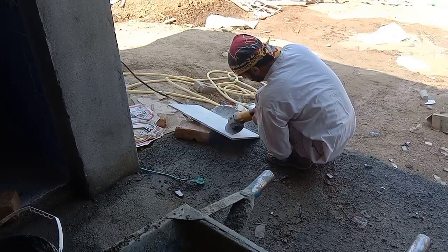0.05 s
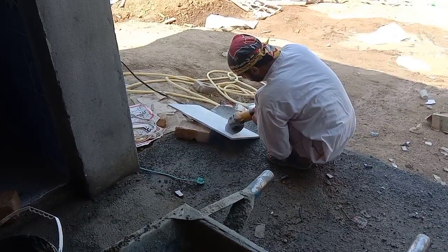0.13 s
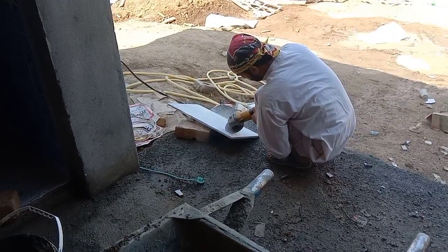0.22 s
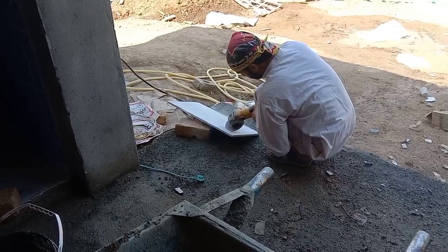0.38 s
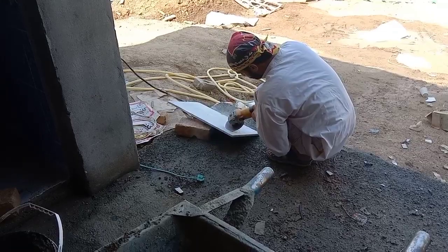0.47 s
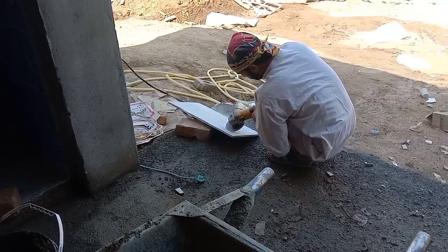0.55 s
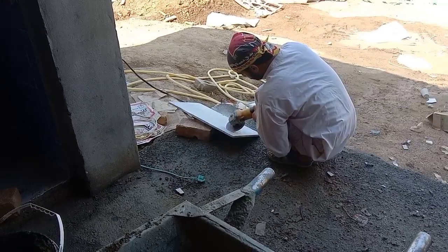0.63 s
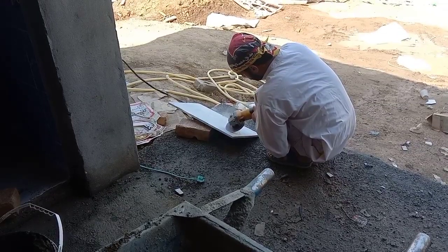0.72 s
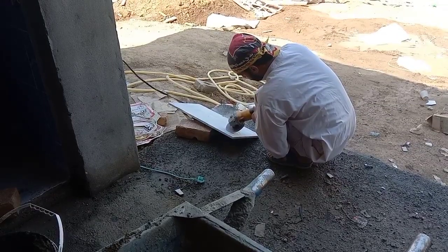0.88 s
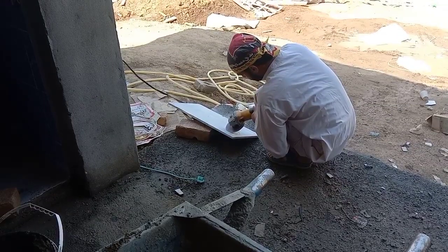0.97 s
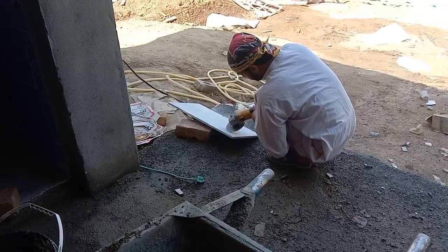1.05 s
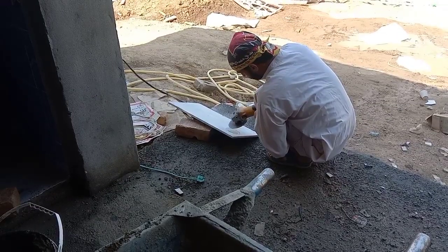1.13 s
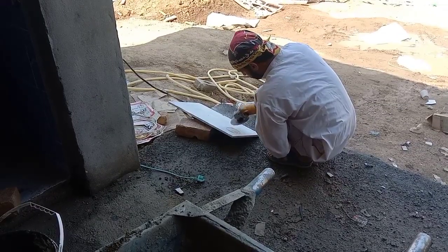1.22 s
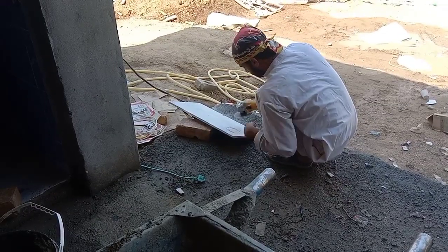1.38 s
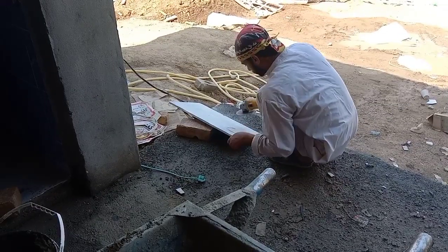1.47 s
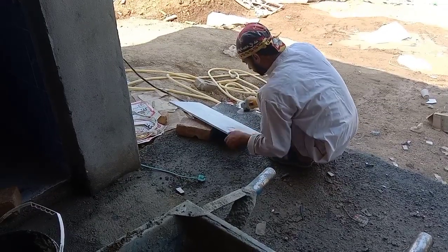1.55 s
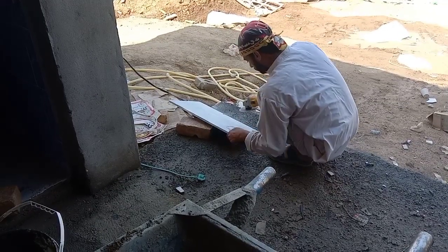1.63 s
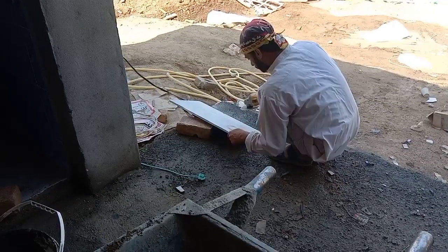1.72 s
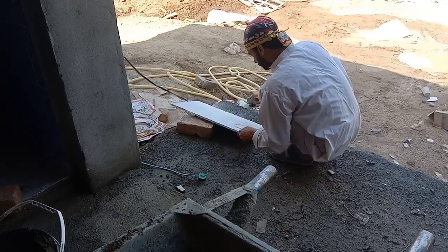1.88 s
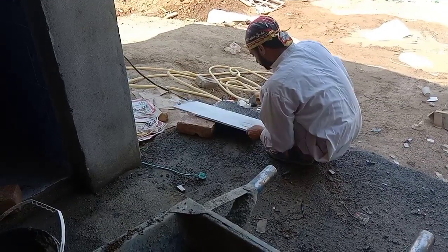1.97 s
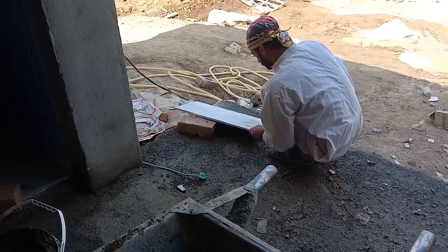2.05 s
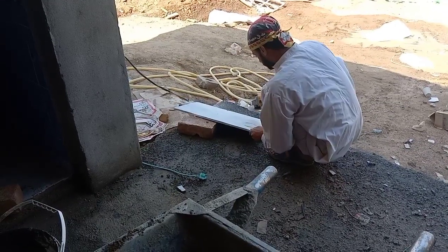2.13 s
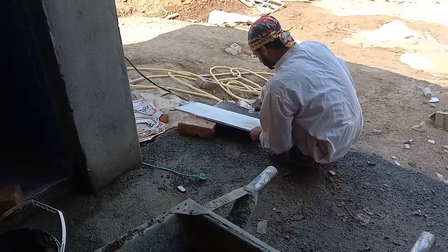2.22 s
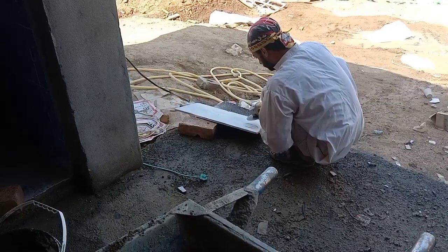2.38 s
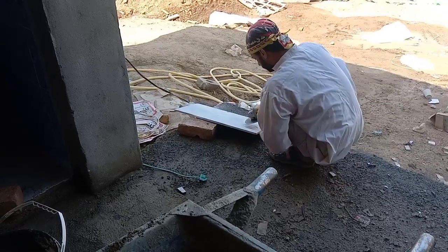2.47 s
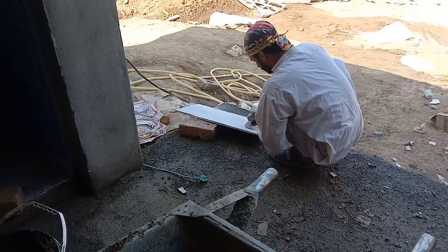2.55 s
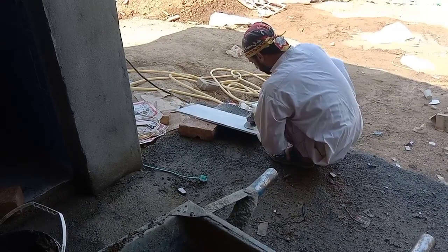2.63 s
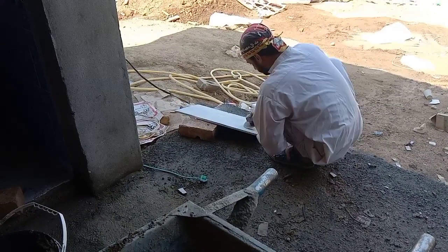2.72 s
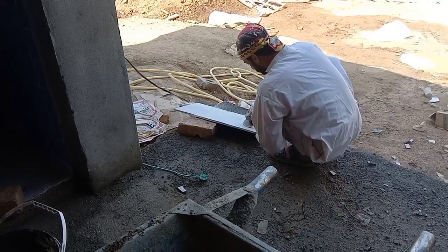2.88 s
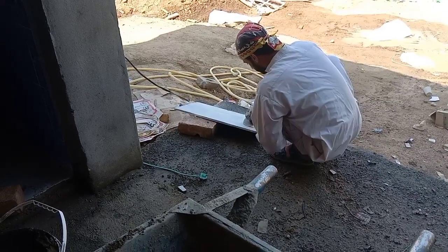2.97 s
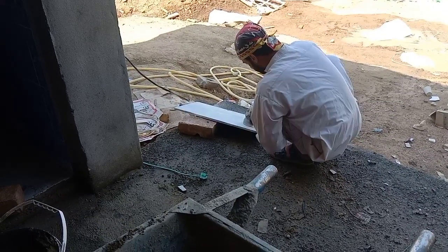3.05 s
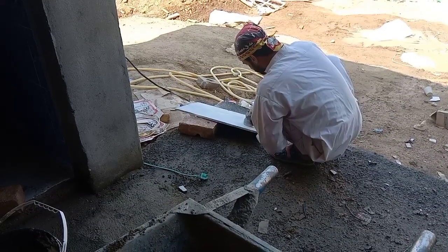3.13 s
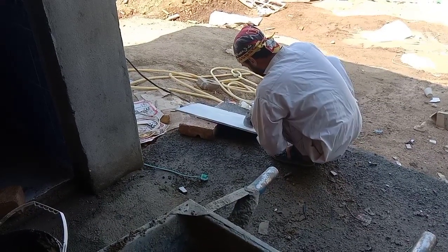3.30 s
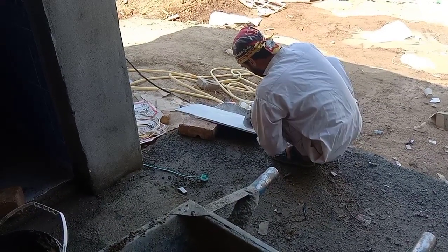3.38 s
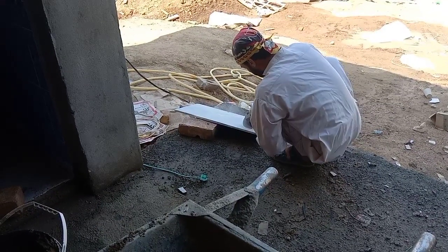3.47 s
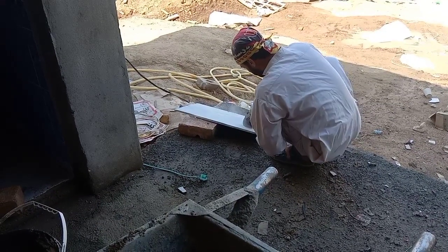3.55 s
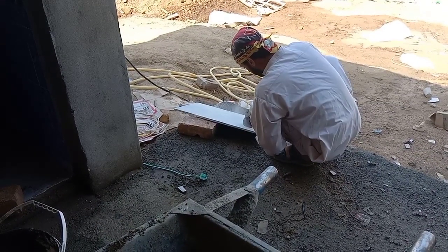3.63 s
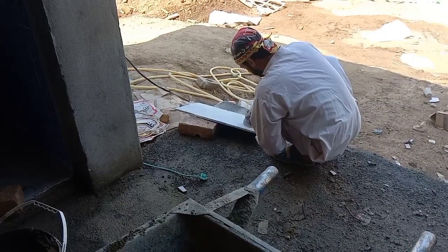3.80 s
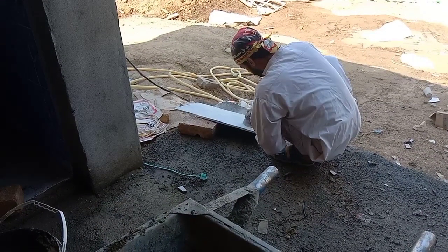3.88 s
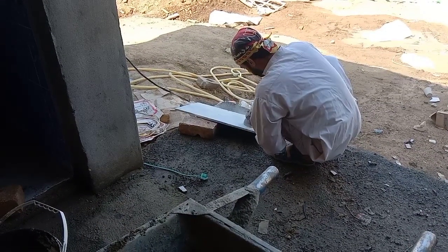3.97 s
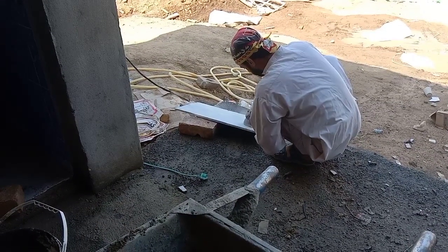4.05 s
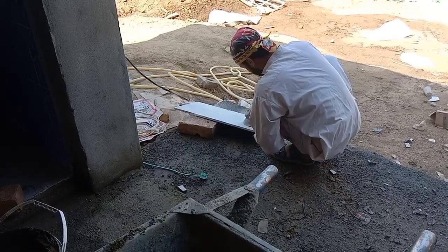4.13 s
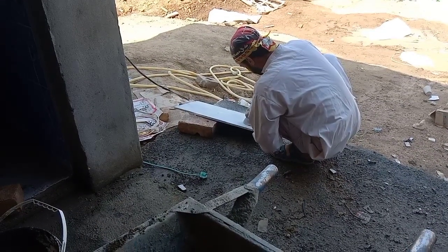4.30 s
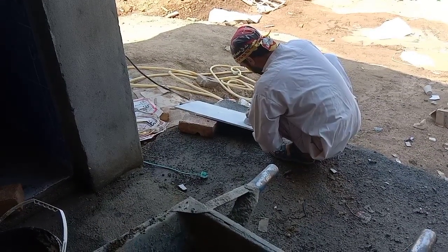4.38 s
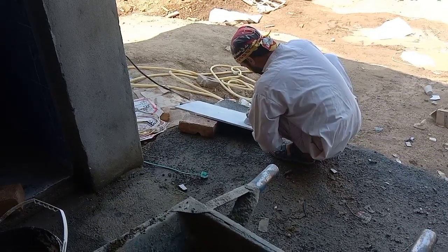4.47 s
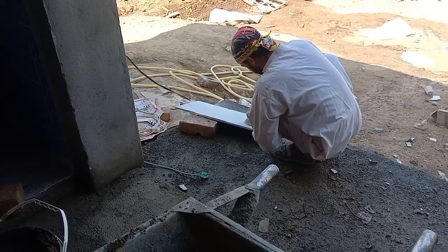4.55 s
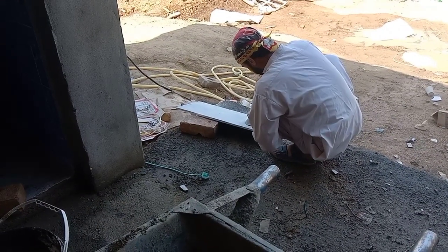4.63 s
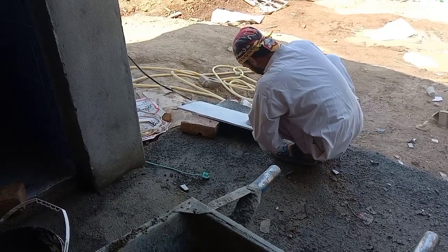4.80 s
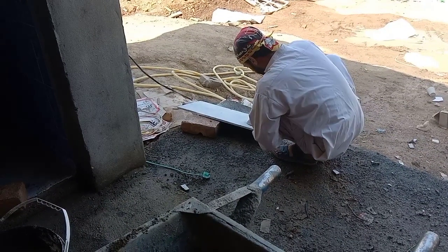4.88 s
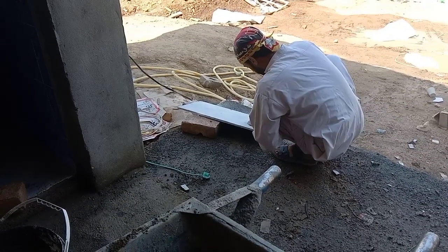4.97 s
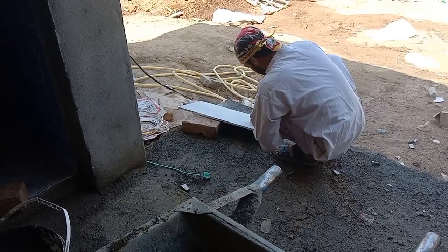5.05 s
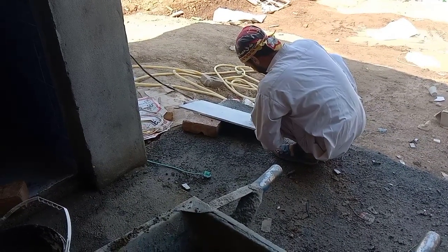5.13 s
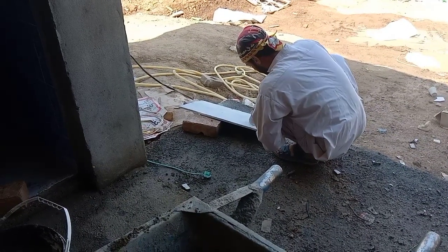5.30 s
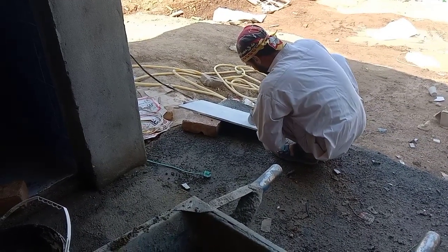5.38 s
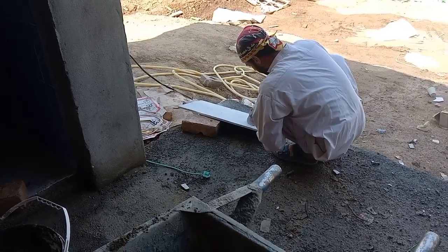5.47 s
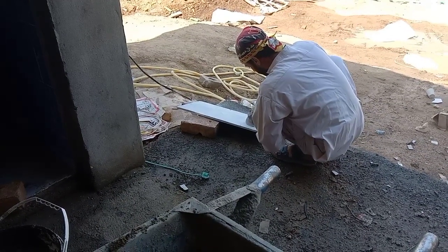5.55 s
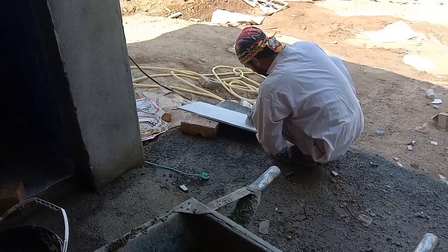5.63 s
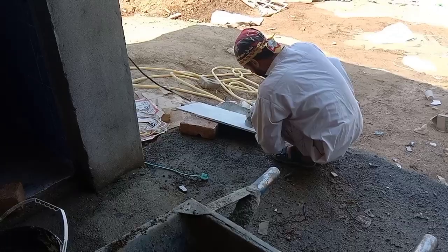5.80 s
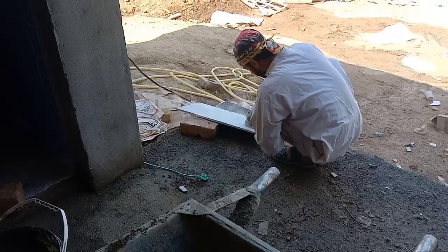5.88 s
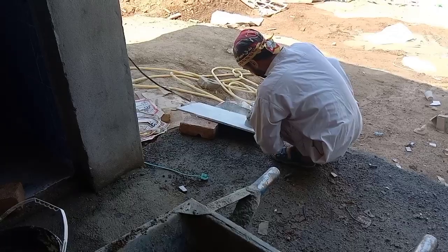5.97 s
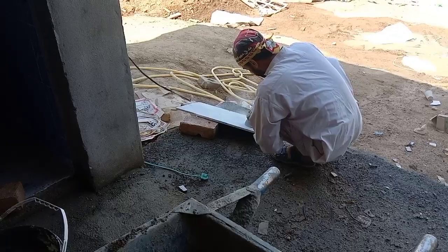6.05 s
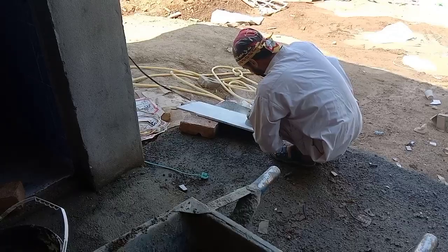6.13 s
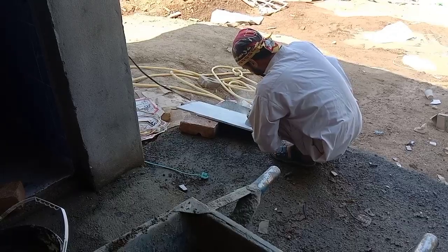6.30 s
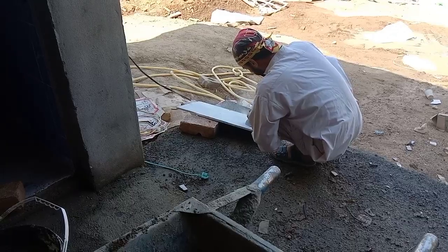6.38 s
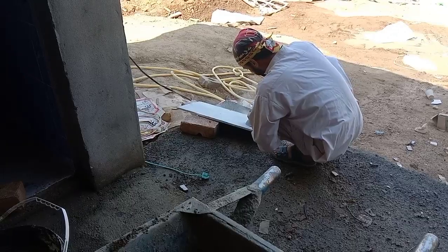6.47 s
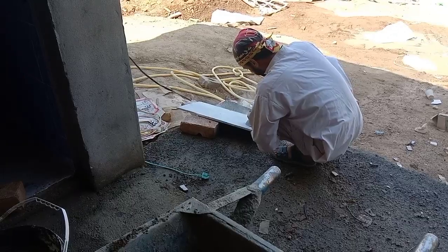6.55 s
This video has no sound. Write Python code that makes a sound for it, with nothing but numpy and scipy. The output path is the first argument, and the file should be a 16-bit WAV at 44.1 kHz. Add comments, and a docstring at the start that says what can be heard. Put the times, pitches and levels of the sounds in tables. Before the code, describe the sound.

A few steps away outdoors, a steel blade squeals and hisses through stone as an angle grinder works on a slab. The cut stops and the motor runs free with a rushing hum, joined by one short scrape of the slab. The blade ticks against the stone twice, then sinks into a long, ringing screech. A short pause of humming and two more taps precede a final loud cut.

```python
"""An angle grinder is cutting a marble slab propped on a brick, outdoors on a building site: diamond
grit tears at the stone, the steel blade screeches and the slab rings. At 1.1 s the blade lifts and the
motor runs up, humming in the rush of its fan and gears. At 2 s the slab is pushed along the brick.
From 2.6 s two touches lead into a long cut that drags the motor down and slides the blade's modes;
after a lift at 5 s come two more touches and a last cut. The recorder ducks each loud screech."""
import sys
import numpy as np
from scipy import signal
from scipy.fft import rfft, irfft, next_fast_len
from scipy.io import wavfile
from scipy.ndimage import uniform_filter1d, minimum_filter1d

SR = 44100
rng = np.random.default_rng(int(sys.argv[2]) if len(sys.argv) > 2 else 0)


def int16_out(signal):
    """Quantize to a 16-bit WAV file."""
    q = np.round(np.clip(np.atleast_2d(signal).T, -1, 1) * 32767)
    wavfile.write(sys.argv[1], SR, q.astype(np.int16))


N = 291942
TIME = np.arange(N) / SR
FREE_SPEED, WORKING_SPEED, FULL_DRAG = 491, 430, 100   # motor turns per s
GEAR_RATIO = 3.6   # motor turns per blade turn


def from_db(db):
    """Decibels to gain."""
    return np.exp(np.asarray(db) * np.log(10) / 20)


def rms_one(x):
    """Scale to unit rms."""
    return x / np.sqrt(np.mean(x ** 2) + 1e-20)


def envelope(start, end, rise_s, fall_s):
    """Attack, hold and release."""
    attack = 1 - np.exp(-np.maximum(TIME - start, 0) / rise_s)
    return attack * np.exp(-np.clip((TIME - end) / fall_s, 0, 20))


def lagging(x, lag_s):
    """Follow a control with some inertia."""
    r = np.exp(-1 / (lag_s * SR))
    return signal.lfilter([1 - r], [1, -r], x, zi=[r * x[0]])[0]


def drift(hz):
    """Smooth random modulation; rms 1."""
    r = np.exp(-40 * np.pi * hz / SR)
    slow = signal.lfilter([1], [1, -2 * r, r * r], rng.standard_normal(N // 20 + 2002))[2000:]
    return np.interp(np.arange(N) / 20, np.arange(len(slow)), rms_one(slow))


def coloured(noise, spectrum):
    """EQ a steady noise to a curve; rms 1."""
    hz, db = np.transpose(spectrum)
    size = next_fast_len(N)
    f = np.maximum(np.arange(size // 2 + 1) * SR / size, 1)
    gain = from_db(np.interp(np.log(f), np.log(hz), db)) * np.minimum(f / hz[0], 1) ** 2
    return rms_one(irfft(rfft(noise, size) * gain, size)[:N])


def high_pass(x, hz):
    """Low cut: takes away the bass below the given frequency."""
    return signal.sosfilt(signal.butter(4, hz, "high", fs=SR, output="sos"), x)


def grit(grain_db):
    """Countless tiny impacts of uneven size; rms 1."""
    sizes = np.repeat(rng.standard_normal(N // 20 + 1), 20)[:N]
    return rms_one(rng.standard_normal(N) * from_db(grain_db * sizes))


def resonance(force, hz, width_hz, skirt_hz=420, lingering=0, free_width_hz=7, evenness=0):
    """A mode, steady or sliding, shaken by random impacts; a force of 1 gives about rms 1."""
    step = 6   # the swing's cosine and sine parts run at a low rate, then are carried up to pitch
    rate = SR / step
    impacts, late_impacts = force[::step] * rng.standard_normal((2, 2, len(force[::step])))
    r = np.exp(-np.pi * width_hz / rate)
    skirt = np.exp(-2 * np.pi * (skirt_hz + width_hz) / rate)
    power = (1 + r * skirt) / ((1 - r * skirt) * (1 - r * r) * (1 - skirt * skirt))
    swing = signal.lfilter([power ** -.5], np.poly([r, skirt]), impacts)
    if lingering:   # a share rings on, barely damped
        free = np.exp(-np.pi * free_width_hz / rate)
        tail_gain = np.sqrt(1 - free * free) * (1 - skirt)
        tail = signal.lfilter([tail_gain], np.poly([free, skirt]), late_impacts)
        swing = (swing + lingering * tail) / np.hypot(1, lingering)
    if evenness:   # friction feeds a weak swing and checks a strong one
        energy = np.sum(swing ** 2, axis=0)
        usual, now = [np.abs(uniform_filter1d(energy, size=count)) + 1e-12
                      for count in (int(rate / 20), int(rate / 500))]
        swing = swing * np.minimum(usual / now, 10) ** (evenness / 2)
    cosine, sine = [np.interp(TIME, TIME[::step], part) for part in swing]
    cycles = np.cumsum(np.broadcast_to(hz / SR, N))
    phase = (2 * np.pi * (cycles - np.floor(cycles))).astype(np.float32)
    return cosine * np.cos(phase) + sine * np.sin(phase)


def depth(start, sink_s):
    """The blade scores the surface, then sinks in ever faster: 0 to 1."""
    return np.clip((TIME - start) / sink_s, 0, 1) ** 2


# Cue sheet of cuts and touches: start t/s, end t/s, sink-in t/s, full drag/(turns/s), jolt level/dB,
# then send level/dB at full depth for sizzle, squeal, growl, whistle, grinding and slab ring
CUTS = [(-1.0, 1.08, .3, 98.4, -8, -17.7, -14, -11.5, -25.2, -29, -44),
        (2.612, 2.672, .02, 10, -5, -19, -11, -14.5, -21, -35, -36),
        (2.755, 2.795, .02, 5, -18, -27.5, -25, -29, -31, -39, -43),
        (2.83, 5.025, .824, 82, -10, -20.3, -12.8, -13, -22.3, -28.3, -28.5),
        (5.336, 5.366, .02, 10, -5, -23, -13, -12.5, -29, -33, -29),
        (5.488, 5.504, .02, 10, -9, -20.5, -20, -18.5, -23, -30, -39),
        (5.55, 7.0, .173, 94.2, 1, -18.5, -12, -12, -20, -25.5, -27)]
# Envelopes of those six sends, a row each: attack t/s, release t/s, level/dB at the surface vs. depth
SEND_ENVELOPES = [(.002, .018, 1.8), (.012, .045, -.7), (.004, .045, -2), (.002, .02, .3), (.004, .04, -4),
                  (.003, .015, -13.5)]


def contact():
    """How hard the blade on the stone drives each of the six layers, over all the cuts."""
    sends = np.full((len(SEND_ENVELOPES), N), 1e-12)
    for start, end, sink_s, _, _, *levels in CUTS:
        shallow = 1 - depth(start, sink_s)
        for send, db, (rise_s, fall_s, surface_db) in zip(sends, levels, SEND_ENVELOPES):
            send += from_db(db + surface_db * shallow) * envelope(start, end, rise_s, fall_s)
    return sends


def load(ease_off_s=.135):
    """The stone's drag on the motor grows with depth; the hand eases off before each lift."""
    return sum(drag * depth(start, sink_s) * np.clip((end - TIME) / ease_off_s, 0, 1)
               for start, end, sink_s, drag, *_ in CUTS)


def blade_bite(speed, runout=.23, judder_db=.6):
    """The blade bites harder once a turn and judders in the hand."""
    turn = 2 * np.pi * np.cumsum(speed / GEAR_RATIO) / SR
    return (1 + runout * np.sin(turn)) * from_db(judder_db * drift(23))


def blade(force, modes, speed, lingering, evenness=0):
    """A bank of rim waves: those running with the spin rise with speed, those against it fall."""
    spin = (speed - WORKING_SPEED) / GEAR_RATIO
    shares = np.array([from_db(db) * np.sqrt(width) for _, _, width, db in modes])
    rings = [resonance(force, hz + shift * spin, width, lingering=lingering, evenness=evenness)
             for hz, shift, width, _ in modes]
    return shares @ np.array(rings) / np.linalg.norm(shares)


# The steel blade's four mode banks, low to high:
# f/Hz at working speed, slide/(Hz per blade turn/s), width/Hz, relative peak level/dB
GROWL_MODES = [(2396, 2.5, 13, -11.5), (2700, 1.5, 29, -9.5), (2997, -1, 34, -2.5), (3125, 2.5, 39, 0.5),
               (3270, 1, 19, -0.5), (3510, -1.5, 77, 1), (4006, 4, 77, -1.5), (4332, -1, 19, -3.5)]
SQUEAL_MODES = [(5047, 3.3, 24, -2), (5108, 3.3, 40, -7.5), (5578, -4, 28, -3), (6360, 4.5, 40, -14),
                (6560, 4.3, 38, 1.2), (7172, -4, 38, -11)]
SIZZLE_MODES = [(8030, 5.5, 45, -18), (8390, 4.6, 35, -7), (9050, -4.5, 35, -4), (9580, -8, 40, -12),
                (9935, 8, 50, -6), (10505, 7, 34, 0), (11175, -6, 38, 0), (11640, -10, 65, -7),
                (12030, 8.5, 65, -4), (12885, 6.2, 45, -2)]
WHISTLE_MODES = [(13400, -14, 49, -2), (13850, -6.5, 190, -2), (14190, 11, 90, 0), (15040, 5, 70, -13),
                 (15370, -18, 70, -9)]


def screech(speed, bite, jolt, growl, squeal, sizzle, whistle):
    """Grit tearing at the stone, and the jolt of each landing, ring the blade's modes."""
    edge = bite * from_db(.6 * drift(18))   # the highest modes feel the angle of the edge most
    singing = from_db(-.07 * (speed - WORKING_SPEED))   # more whistle as the motor slows
    growl_force = from_db(-1.03) * growl * bite + from_db(-7) * jolt
    squeal_force = from_db(-.1) * squeal * bite + from_db(-6.5) * jolt
    sizzle_force = from_db(-.87) * sizzle * edge + from_db(-5.5) * jolt
    whistle_force = singing * whistle * edge + from_db(-11) * jolt
    return (blade(growl_force, GROWL_MODES, speed, lingering=.4)
            + blade(squeal_force, SQUEAL_MODES, speed, lingering=.38, evenness=.22)
            + blade(sizzle_force, SIZZLE_MODES, speed, lingering=.29)
            + blade(whistle_force, WHISTLE_MODES, speed, lingering=.15))


# EQ of grit grinding marble: f/Hz, relative level/dB
KERF_EQ = [(300, -20), (750, -11), (1000, -5.5), (1250, -8.5), (1500, 5.5), (2250, 0.5), (3300, 8),
           (4550, -7), (5900, 7), (6900, -3), (7700, -13.5), (9500, 0), (12000, -11), (15500, -10)]


def kerf_hiss(grinding, bite):
    """Grit hisses in the kerf, pulsing with the blade's bite."""
    return from_db(8) * grinding * bite * coloured(grit(grain_db=3.5), KERF_EQ)


# The hum swells and fades as the motor's speed changes: motor rotation f/Hz, relative level/dB
HUM_BY_SPEED = [(390, -61), (412, -57), (430, -54), (443, -42), (455, -37.5), (463, -45), (470, -42),
                (479, -37), (490, -38.5)]


def motor_hum(speed, turn, grip, waver_db=1.5, loaded_waver_db=3.5, damping_db=6):
    """Unbalance hums once a turn and stirs the guard; the stone's grip damps the spindle."""
    loaded_db = grip * (loaded_waver_db * drift(8) - damping_db)
    swell_db = .2 + np.interp(speed, *np.transpose(HUM_BY_SPEED))
    unbalance = from_db(swell_db + waver_db * drift(6) + loaded_db)
    hum = unbalance * np.sqrt(2) * (np.sin(turn) + from_db(-14.5) * np.sin(2 * turn))
    free_running = np.minimum(unbalance / from_db(-44), 1)
    guard = resonance(free_running * from_db(-49), hz=538, width_hz=12.4, skirt_hz=80)
    return hum + guard


# Resonances of guard and housing: f/Hz, width/Hz, relative peak level/dB
HOUSING_MODES = [(3116, 63, 6), (3330, 110, 3.5), (3610, 250, -2.5), (9000, 310, -13), (10360, 210, -9.5),
                 (11280, 320, -11.5), (11900, 100, -13), (12520, 120, -18), (12970, 120, -8.5)]
# EQ of the fan and gear rush: f/Hz, relative level/dB
RUSH_EQ = [(150, -76), (380, -21.5), (700, -23), (1000, -14), (1500, -9.5), (2500, -8.5), (3300, -2),
           (4400, -9.5), (5700, 1), (7000, -12), (8200, -28), (10800, -18), (13000, -22.5), (15500, -28)]


def fan_and_gears(turn, rattle_db=1.9, runout=.1):
    """Fan and gears rush and rattle through the housing, a bed under the whole scene."""
    rattle = from_db(rattle_db * drift(74)) * (1 + runout * np.sin(turn / GEAR_RATIO))
    housing = sum(from_db(db) * np.sqrt(width) * resonance(rattle, hz, width)
                  for hz, width, db in HOUSING_MODES)
    rush = coloured(grit(grain_db=.5), RUSH_EQ) * (1 + runout * np.sin(turn))
    return from_db(-24.5) * rush + from_db(-27.5) * rms_one(housing)


# EQ of the slab's low shudder: f/Hz, relative level/dB
SHUDDER_EQ = [(20, -14), (60, -3), (130, 4), (220, 2), (350, -6.5), (700, -22)]


def slab_shudder(drag, full_drag_db=-51, idle_db=-77, rocking_db=4.5, lumps_db=2.5):
    """The slab rocks and shudders in lumps, harder as the drag grows."""
    rocking = from_db(full_drag_db + rocking_db * drift(10)) * (drag / FULL_DRAG) ** 2.5
    lumps = from_db(lumps_db * drift(25))
    return (rocking + from_db(idle_db)) * lumps * coloured(rng.standard_normal(N), SHUDDER_EQ)


# Modes of the marble slab: f/Hz, width/Hz, relative rms level/dB
SLAB_MODES = [(1069, 16, -.5), (1435, 21, -7.5), (1579, 28, -12), (1960, 18, -8), (2413, 13, -6)]


def slab_ring(ringing, pushing, chatter_db=1, idle_db=-55):
    """The marble rings when cut or pushed, and faintly under the free blade."""
    shaking = ringing * from_db(chatter_db * drift(8)) + pushing + from_db(idle_db)
    return sum(from_db(db) * resonance(shaking, hz, width, skirt_hz=87, evenness=.17)
               for hz, width, db in SLAB_MODES)


# Cue for the push: start t/s, end t/s, scrape level/dB, slab ring send level/dB
PUSH = (1.985, 2.09, -25, -40)
# EQ of marble sliding on brick: f/Hz, relative level/dB
SCRAPE_EQ = [(100, -46), (230, -10), (330, -17), (700, -12), (1050, -5), (1400, -2), (2300, -16), (3200, 6),
             (4500, -7), (12000, -33)]


def slab_push():
    """The slab slides along the brick: returns the gritty scrape and the force that rings the slab."""
    start, end, scrape_db, ring_db = PUSH
    push = envelope(start, end, rise_s=.025, fall_s=.025)
    scrape = from_db(scrape_db) * push * coloured(grit(grain_db=1.5), SCRAPE_EQ)
    return scrape, from_db(ring_db) * push


def landing_jolts(decay_s=.0016):
    """The short kick each time the rim lands on the stone."""
    return sum(from_db(db) * (TIME >= start) * np.exp(-np.clip((TIME - start) / decay_s, 0, 20))
               for start, _, _, _, db, *_ in CUTS)


def chips(jolt):
    """Each landing chips the stone with a bright tick."""
    return from_db(-22) * jolt * high_pass(rng.standard_normal(N), hz=2600)


def scene():
    """The load sets the motor's speed. Grinder and slab sit a few steps away, dead centre."""
    drag = load()
    speed = FREE_SPEED - lagging(drag, lag_s=.656)   # the motor's inertia
    sizzle, squeal, growl, whistle, grinding, ringing = contact()
    grip = np.minimum(sizzle / from_db(-21), 1)   # full grip once the sizzle send reaches -21 dB
    bite = blade_bite(speed)
    jolt = landing_jolts()
    cutting = screech(speed, bite, jolt, growl, squeal, sizzle, whistle)
    cutting += kerf_hiss(grinding, bite) + chips(jolt)
    turn = 2 * np.pi * np.cumsum(speed * (1 + .0021 * drift(13))) / SR   # motor angle, slight flutter
    motor = motor_hum(speed, turn, grip) + fan_and_gears(turn)
    scrape, pushing = slab_push()
    slab = slab_shudder(drag) + slab_ring(ringing, pushing) + scrape
    mix = high_pass(cutting + motor, hz=207) + slab
    return np.array([mix, mix])


def gain_control(x, threshold_db=-13.5, share=.8, attack_s=.01, hold_s=.115, release_db_per_s=60):
    """The recorder ducks quickly when the sound is loud, holds, then comes back up."""
    level_db = 10 * np.log10(np.abs(uniform_filter1d(x ** 2, size=900)) + 1e-12)
    over_db = share * np.maximum(level_db - threshold_db, 0)
    half = int(hold_s * SR / 2)
    held_db = -minimum_filter1d(-over_db, 2 * half + 1, origin=half)
    recovery_db = release_db_per_s * TIME
    duck_db = np.maximum.accumulate(held_db + recovery_db) - recovery_db
    return from_db(-lagging(duck_db, attack_s))


def record(dry):
    """Gain control rides the screech, the rare highest peaks clip and a steep filter cuts the top."""
    clipped = np.clip(dry * gain_control(dry[0]), -.82, .82)
    high_cut = signal.ellip(12, .1, 90, 15650, fs=SR, output="sos")
    return signal.sosfilt(high_cut, clipped)


dry = scene()
out = record(dry)
int16_out(out)
```